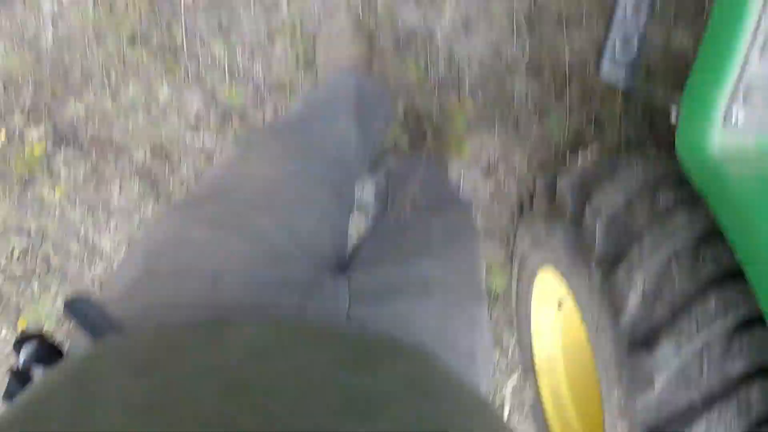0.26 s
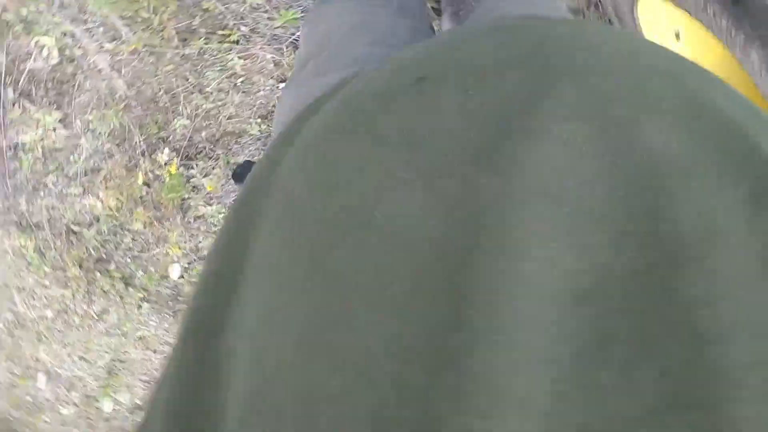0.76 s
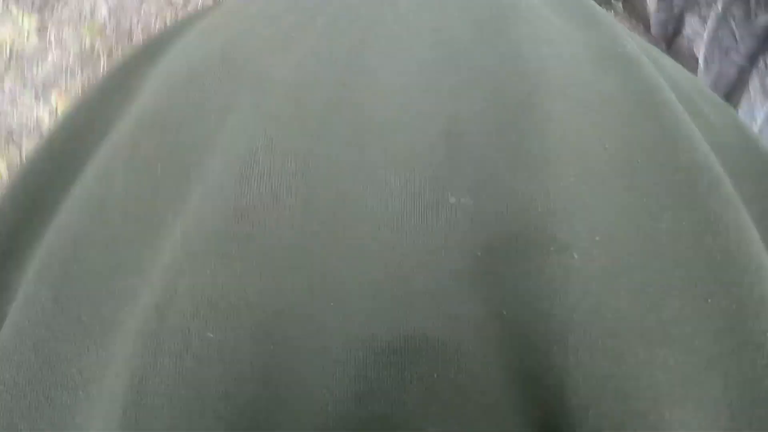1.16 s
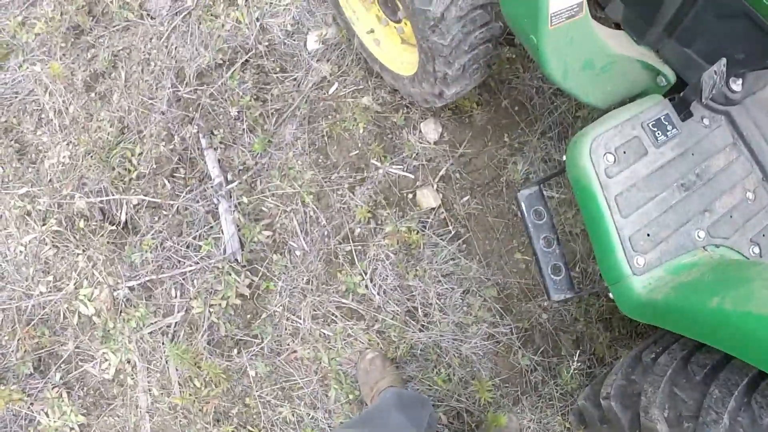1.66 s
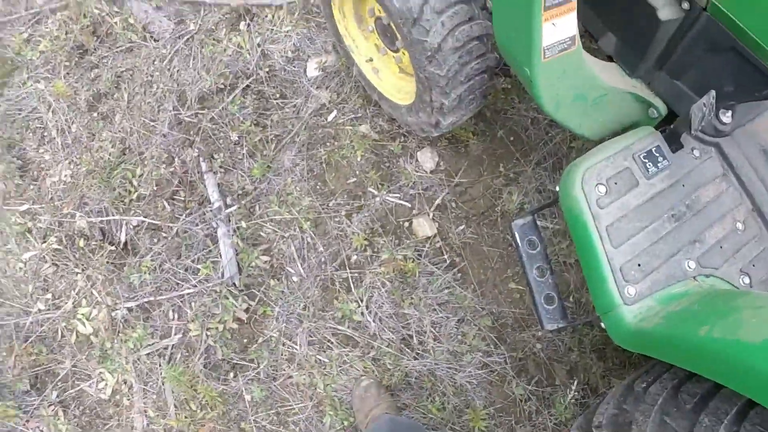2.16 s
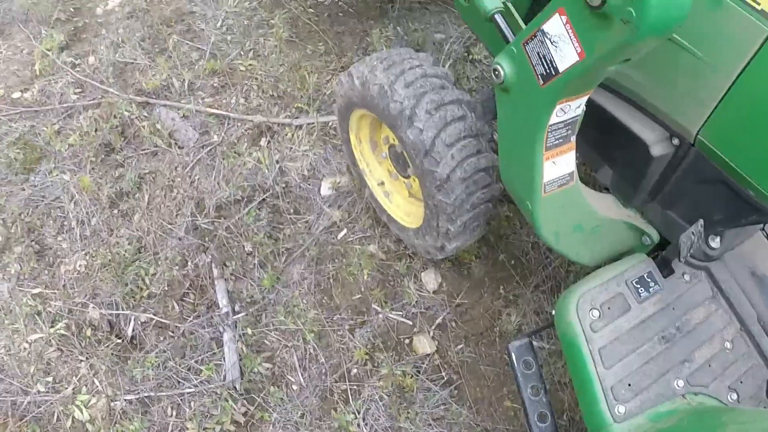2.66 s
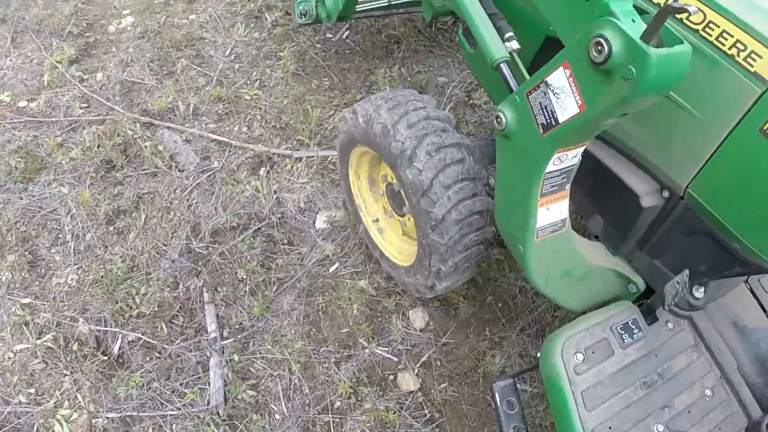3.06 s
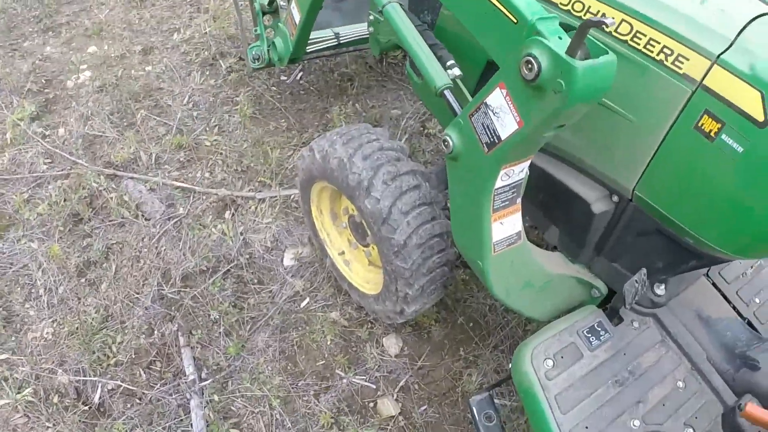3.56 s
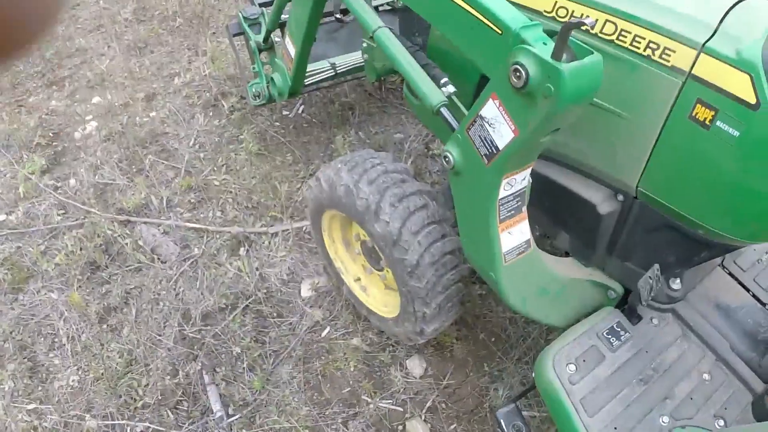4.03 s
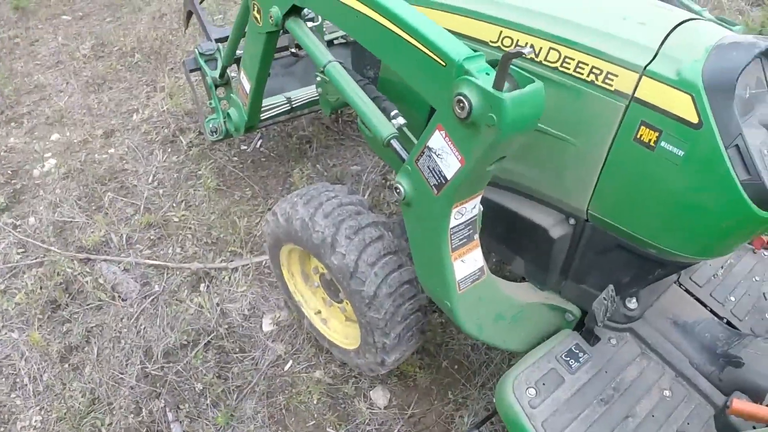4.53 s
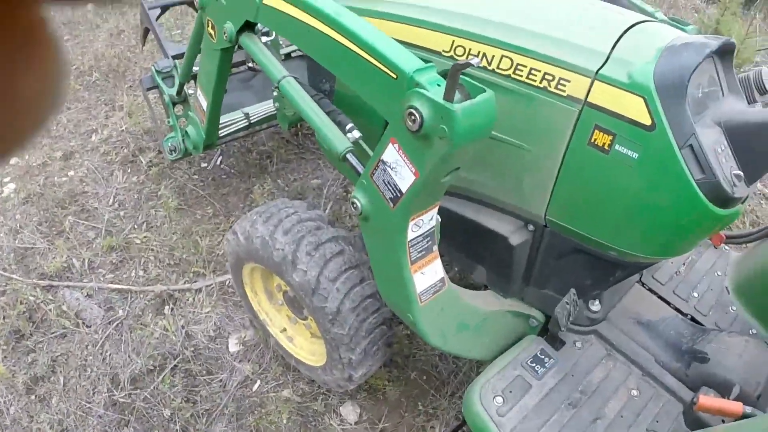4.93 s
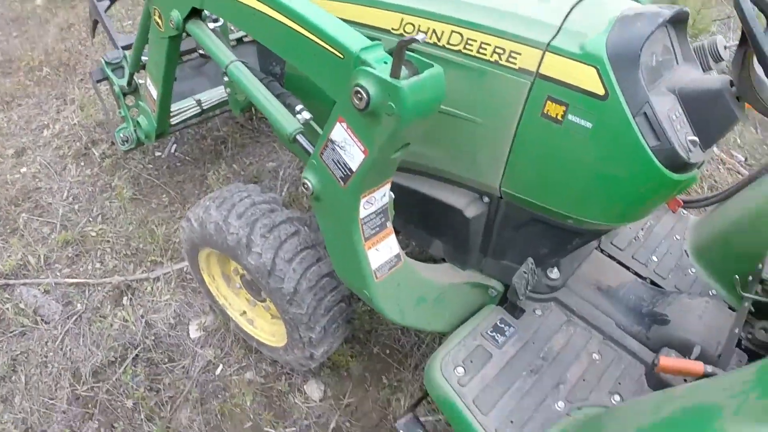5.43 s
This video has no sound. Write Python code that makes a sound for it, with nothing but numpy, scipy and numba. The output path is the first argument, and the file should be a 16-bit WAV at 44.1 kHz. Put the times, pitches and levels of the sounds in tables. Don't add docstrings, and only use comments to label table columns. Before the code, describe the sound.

A small plastic camera is handled outdoors: faint rustles, a hard double knock, near quiet, then a dense burst of scraping, pops and creaks.

```python
import sys
import numpy as np
from scipy import signal
from scipy.fft import rfft, irfft
from scipy.io import wavfile
from scipy.ndimage import uniform_filter1d
from numba import njit

SR = 44100
rng = np.random.default_rng(int(sys.argv[2]) if len(sys.argv) > 2 else 0)


def invert_db(x):
    u = np.asarray(x, float) / 20
    return 10 ** u


def unload_wav(signal):
    wavfile.write(
        sys.argv[1],
        SR,
        np.round(np.clip(np.atleast_2d(signal).T, -1, 1) * 32767).astype(np.int16),
    )


N = 250929


def level(x, db):
    return x * invert_db(db) / np.sqrt(np.mean(x ** 2))


def columns(rows):
    s, *rest = np.transpose(rows)
    return [np.interp(np.arange(N) / SR, s, column) for column in rest]


def band(x, lo_hz, hi_hz, order=2):
    return signal.sosfilt(signal.butter(order, [lo_hz, hi_hz], "band", fs=SR, output="sos"), x)


def ring(x, modes, narrow=0.96):
    total = 0
    for k, (hz, width, db) in enumerate(modes):
        b, a = signal.iirpeak(hz, narrow * hz / width, fs=SR)
        total = total + (-1) ** k * invert_db(db) * signal.lfilter(b, a, x)
    return total


@njit
def moving_band(x, hz, width):
    y, b, l = np.empty(len(x)), 0., 0.
    for i in range(len(x)):
        g, k = np.tan(np.pi * hz[i] / SR), width / hz[i]
        v = (b + g * (x[i] - l)) / (1 + g * (g + k))
        b, l, y[i] = 2 * v - b, l + 2 * g * v, k * v
    return y


def bent(x, modes, hz, narrow=0.84):
    total = 0
    for k, (mode_hz, width, db) in enumerate(modes):
        moved_hz = mode_hz * hz / modes[1][0]
        total = total + (-1) ** k * invert_db(db) * moving_band(x, moved_hz, width / narrow)
    return total


def walk(rate):
    k = int(SR / rate)
    steps = np.repeat(rng.standard_normal(N // k + 1), k)
    return 1.08 * uniform_filter1d(uniform_filter1d(steps, k), k)[:N]


def dying_tone(u, hz, t60):
    return np.sin(2 * np.pi * hz * u) * np.exp(-np.log(1000) * u / t60)


def touch(start, hold, rise_db_s, fall_db_s):
    u = np.arange(0, N, 8) / SR - start
    slope_db = np.minimum(rise_db_s * u, fall_db_s * (hold - u))
    return invert_db(2 * np.minimum(0, slope_db).clip(-90))


# (pitch_hz, level_db)
AIR_COLOUR = [(290, -35.5), (500, -4.5), (695, -8), (1440, -4.5), (1520, -20), (1730, -11.5), (2030, -7),
              (15200, -37)]


def air():
    hz, db = np.transpose(AIR_COLOUR)
    f = np.arange(N // 2 + 1) * SR / N + 1
    colour = invert_db(np.interp(np.log(f), np.log(hz), db))
    return level(irfft(rfft(rng.standard_normal(N)) * colour, N), -57.5)


# (time_s, level_db)
HUSH_LEVEL = [
    (0, 0),
    (1.22, 0),
    (1.25, -7),
    (1.55, -4),
    (1.9, 0),
    (5.1, 0),
    (5.25, -4),
    (5.5, 1),
    (5.69, 2),
]


def changing_hush():
    return invert_db(columns(HUSH_LEVEL)[0]) * air()


# (time_s, level_db, hum_pitch_hz, hum_share_db)
BREEZE_GUSTS = [(0.0, -50, 393, -20), (0.75, -55, 330, -12), (1.1, -50, 229.3, 1), (1.5, -51, 387, -3),
                (2.2, -51, 374, 2.5), (2.63, -56, 286.3, -25), (3.17, -53.5, 348.7, -12),
                (4.18, -43.5, 476.5, -9), (4.93, -49.5, 288.2, -2), (5.02, -44, 401.5, -3),
                (5.69, -53, 328.5, -5.5)]


def breeze():
    gust_db, hz, hum_db = columns(BREEZE_GUSTS)
    slow_filter = signal.butter(2, 60, fs=SR, output="sos")
    slow = level(signal.sosfilt(slow_filter, rng.standard_normal((2, N))), 0)
    phase = 2 * np.pi * np.cumsum(hz) / SR
    hum = slow[0] * np.cos(phase) + slow[1] * np.sin(phase)
    flutter = level(band(rng.standard_normal(N), 130, 600), 0)
    waver_db = 1.3 * walk(30)
    return invert_db(gust_db + waver_db) * (invert_db(hum_db) * hum + invert_db(1) * flutter)


# (start_s, pitch_hz, peak_db, t60_s)
PALM_THUMPS = [
    (3.399, 54, -18.5, 0.057),
    (3.652, 70, -22, 0.037),
    (3.738, 75, -15, 0.029),
    (4.021, 51.4, -20.5, 0.11),
    (4.912, 63, -4, 0.06),
]


def thump(s, hz, db, t60):
    u = np.maximum(np.arange(N) / SR - s, 0)
    return invert_db(db) * dying_tone(u, hz, t60) * (1 - np.exp(-u / 0.0026))


# (time_s, level_db)
RESTING_GRIP = [
    (0.0, -52),
    (1.13, -55),
    (1.56, -59.5),
    (2.51, -53),
    (3.2, -58.5),
    (4.4, -46),
    (5.3, -80),
    (5.69, -49.5),
]
# (start_s, hold_s, level_db)
GRIP_SQUEEZES = [(1.22, 0.016, -47), (1.35, 0.052, -47.5), (3.29, 0.081, -50), (3.34, 0.024, -44),
                 (3.841, 0.032, -36), (3.89, 0.046, -33.5), (3.976, .015, -40), (4.22, 0.017, -36),
                 (4.267, .015, -36), (4.338, 0.018, -47), (4.778, 0.026, -38), (5.068, 0.018, -45),
                 (5.195, 0.037, -41.5), (5.395, 0.068, -44.5), (5.625, 0.04, -50)]


def grip():
    wobble = level(band(rng.standard_normal(N), 12, 99), 0.085)
    power = invert_db(2 * columns(RESTING_GRIP)[0][::8])
    for s, hold, db in GRIP_SQUEEZES:
        power = power + invert_db(2 * db) * touch(s, hold, rise_db_s=485, fall_db_s=406.5)
    strength = np.interp(np.arange(N), np.arange(0, N, 8), np.sqrt(power))
    unsteady = invert_db(2.2 * walk(22))
    return wobble * strength * unsteady + sum(thump(*row) for row in PALM_THUMPS)


# (start_s, hold_s, pitch_hz, level_db)
EDGE_SHEENS = [(1.26, .11, 9700, -68), (1.39, .075, 2850, -59), (2.27, .2, 6000, -68),
               (3.846, .016, 7000, -34), (4.285, .04, 7300, -33), (4.06, .04, 3900, -35),
               (4.65, .012, 4100, -30), (4.74, .02, 4000, -32), (4.78, .025, 7200, -40),
               (4.897, .022, 7400, -38), (4.96, .025, 7000, -41), (5.01, .045, 3900, -34),
               (5.41, .03, 4100, -34), (5.507, .018, 3900, -35)]


def sheens():
    out, u = np.zeros(N), np.arange(-2500, 11500) / SR
    slope_db_s, width = 1400, 0.22
    noises = rng.standard_normal((len(EDGE_SHEENS), len(u)))
    for (s, hold, hz, db), noise in zip(EDGE_SHEENS, noises):
        tone = level(band(noise, hz * (1 - width / 2), hz * (1 + width / 2)), db)
        swell = invert_db(np.minimum(0, slope_db_s * np.minimum(u, hold - u)))
        at = int((s + u[0]) * SR)
        out[at:at + len(u)] += (tone * swell)[:N - at]
    return out


# (start_s, pitch_hz, peak_db, t60_s)
GRIT_TICKS = [(0.144, 910, -33, .03), (0.162, 1600, -34, .03), (0.277, 860, -28, .03),
              (0.311, 3300, -32, .02), (0.3275, 2850, -29, .025), (0.393, 1600, -37, .03),
              (0.52, 900, -34, .03), (0.476, 870, -32, .03), (0.502, 2800, -35, .02),
              (0.676, 4500, -40, .012), (0.691, 1620, -29, .03), (0.713, 2500, -36, .015),
              (1.276, 2900, -36, .03), (1.346, 1150, -24, .025), (2.2742, 2580, -28, .016),
              (2.275, 1800, -35, .02), (2.3146, 2580, -34, .025), (2.4727, 2710, -32, .016),
              (2.5076, 2790, -34, .025), (2.508, 6300, -40, .02), (2.5336, 1570, -36, .03),
              (2.5336, 2800, -38, .03), (2.5655, 2880, -42, .03), (3.7298, 2740, -15, .025),
              (3.8459, 2820, -9, .015), (3.955, 600, -18, .03), (4.6155, 900, -20, .03),
              (5.1997, 2750, -3, .011), (5.227, 1250, -15, .02), (5.4565, 3800, -18, .012)]


def ticks():
    out, u = np.zeros(N), np.arange(2000) / SR
    for s, hz, db, t60 in GRIT_TICKS:
        at = int(s * SR)
        out[at:at + len(u)] += invert_db(db) * dying_tone(u, hz, t60) * (1 - np.exp(-u / .0003))
    return out


# (start_s, pitch_hz, width_hz, peak_db, t60_s)
NAIL_FLICKS = [(3.6925, 3241, 3000, -30, .03), (3.704, 480, 280, -26, 0.019),
               (3.768, 3926, 1389, -14, 0.032), (3.8455, 3300, 2315, -14, .012),
               (4.627, 4167, 6000, -21, 0.014), (4.676, 4630, 4630, -31, 0.014),
               (4.7915, 7000, 7000, -11.5, .008), (4.8562, 4400, 2778, -19, 0.018),
               (5.2395, 2600, 1500, -33, 0.0084), (3.237, 1450, 231.5, -31.5, 0.046),
               (2.508, 1000, 400, -36, .04), (2.315, 1600, 700, -40, 0.02), (2.472, 1800, 900, -41, 0.02),
               (4.4554, 880, 203, -12.5, 0.034), (0.424, 1840, 500, -28, 0.03),
               (1.605, 4500, 3030, -48, .015), (4.468, 880, 200, -12.5, 0.045),
               (4.478, 880, 200, -13.5, .06), (4.489, 880, 200, -12, 0.052),
               (1.331, 2900, 500, -21.5, 0.064), (1.392, 3600, 1510, -34.5, .02),
               (0.327, 1300, 700, -19, 0.025), (0.501, 900, 400, -31, 0.03), (3.741, 2770, 400, -14, 0.046),
               (3.985, 850, 200, -13.5, 0.074), (4.181, 1100, 600, -7.5, .03),
               (4.189, 1200, 700, -5, 0.034), (4.2343, 2800, 900, -5.5, 0.028),
               (4.272, 2780, 900, -7.5, 0.035), (4.763, 890, 200, -12.5, 0.13),
               (4.779, 910, 250, -12.5, 0.053), (5.1988, 13000, 6000, -19, 0.005),
               (0.16, 2700, 500, -38, .03), (0.785, 1700, 400, -38.5, 0.036)]


def flicks():
    out, u = np.zeros(N), np.arange(2000) / SR
    noises = rng.standard_normal((len(NAIL_FLICKS), len(u)))
    for (s, hz, width, db, t60), noise in zip(NAIL_FLICKS, noises):
        tone = noise * np.exp(-np.log(1000) * u / t60)
        for _ in range(2):
            tone = moving_band(tone, hz + 0 * u, 1.5 * width)
        at = int(s * SR)
        out[at:at + len(u)] += invert_db(db) * tone / np.abs(tone).max()
    return out


# (time_s, wall_drag_db, hiss_above_drag_db)
CLOTH_DRAG = [(0.0, -52, -13), (0.5, -53.5, -12), (0.58, -56.5, -5.5), (1.15, -57.5, -9.5),
              (1.25, -56.5, -22), (1.47, -60, -10), (2.22, -63.5, -2), (2.28, -57, -2), (2.53, -55.5, -1),
              (2.6, -55.5, -12), (3.2, -60, -1.5), (3.38, -44, -17), (3.64, -55.5, -11.5), (5.2, -37, -17),
              (5.26, -71, -13)]
# (start_s, hold_s, wall_db, lid_above_wall_db)
FINGER_PRESSES = [(3.392, 0.0075, -29.5, 2), (3.723, 0.0027, -24.5, -20), (3.74, 0.013, -26, 6),
                  (3.8, 0.066, -33.5, -6), (3.848, 0.034, -30, -2), (3.91, 0.025, -25.5, -4),
                  (3.973, 0.019, -18, -4), (4.04, 0.0061, -24.5, -16), (4.06, .05, -34.5, 5),
                  (4.12, 0.044, -27, -1), (4.167, 0.035, -17.5, -8), (4.213, 0.063, -24, 3),
                  (4.266, 0.051, -20.5, -5), (4.332, 0.088, -26, -7), (4.429, 0.011, -22, -10),
                  (4.453, 0.044, -25.5, -9), (4.506, 0.047, -30, 0), (4.63, .028, -32, 0.5),
                  (4.7, 0.038, -29, -10), (4.745, 0.048, -23, -9), (4.88, 0.015, -42.5, 2),
                  (4.915, 0.0077, -18, -9), (4.963, 0.033, -26, -8), (4.998, 0.059, -33.5, -11),
                  (5.071, 0.025, -29.5, -14), (5.124, 0.055, -37, -7.5), (5.227, 0.0028, -29.5, -2),
                  (5.379, 0.067, -33, -5), (5.445, 0.01, -27, -2.5), (5.506, 0.018, -38, -9)]
# (start_s, hold_s, scratch_db, hiss_above_scratch_db)
SKIN_SLIDES = [(3.39, 0.0048, -33.5, -9.5), (3.682, 0.019, -43.5, -4.5), (3.731, 0.011, -22.5, -15.5),
               (3.759, 0.008, -29.5, -13), (3.795, 0.028, -35.5, -8.5), (3.852, 0.006, -21, -3),
               (3.883, 0.015, -25.5, -7), (3.924, 0.012, -21, -5.5), (3.946, 0.025, -26.5, 0),
               (3.978, 0.013, -18, -10.5), (4.034, 0.19, -23, -12), (4.185, 0.025, -17.5, -16),
               (4.213, 0.008, -21, -4), (4.261, 0.02, -14.5, -8), (4.282, 0.028, -18.5, -6.5),
               (4.325, 0.034, -29, -13.5), (4.373, 0.064, -21.5, -11), (4.512, 0.037, -29.5, -9),
               (4.545, 0.029, -28.5, -15), (4.742, 0.013, -22, -5), (4.772, 0.023, -24, -10),
               (4.8, 0.032, -29, -11), (4.858, 0.03, -35.5, -16), (4.907, 0.011, -25, -2.5),
               (4.963, 0.048, -27, -13.5), (4.988, 0.07, -29, -16), (5.065, .045, -34, -13),
               (5.106, 0.081, -41, -28), (5.392, .025, -29, -9.5), (5.413, 0.024, -23.5, -7),
               (5.452, 0.015, -31, -10.5), (5.51, 0.012, -29, -14)]
# (start_s, hold_s, scratch_db, hiss_above_scratch_db)
STICKING_SWEEPS = [
    (4.656, 0.0083, -20, -10.5),
    (3.873, 0.0085, -29, -12),
    (5.185, 0.013, -32, -18),
    (4.231, 0.0067, -15, -10),
]
# (start_s, hold_s, wall_db, scratch_above_wall_db)
SLEEVE_RUBS = [
    (0.132, 0.074, -43.5, -9),
    (0.251, 0.049, -40.5, -10),
    (0.32, 0.13, -45.5, -8),
    (0.471, 0.062, -44.5, -10),
    (1.192, 0.017, -46, -5),
    (1.266, 0.038, -45.5, 2.5),
    (1.327, .043, -38, -6.5),
    (1.399, 0.0045, -50, 0),
    (1.87, 0.09, -55, 0.5),
]


def contact():
    drag_db, fine_db = np.array(columns(CLOTH_DRAG))[:, ::8]
    cloth_db = drag_db + np.array([0 * fine_db, 6 + 0.55 * fine_db, 4.5 + 0.51 * fine_db, fine_db])
    power = invert_db(2 * cloth_db)

    def add(parts_db, s, hold, rise_db_s, fall_db_s):
        return power + invert_db(2 * np.array(parts_db))[:, None] * touch(s, hold, rise_db_s, fall_db_s)

    for s, hold, db, lid_db in FINGER_PRESSES:
        power = add([db, db + lid_db, db - 8, db - 29], s, hold, 907, 815)
    for s, hold, db, hiss_db in SKIN_SLIDES:
        power = add([db - 17, db - 11.5, db, db + hiss_db], s, hold, 800, 806)
    for s, hold, db, hiss_db in STICKING_SWEEPS:
        power = add([db - 17, db - 11.5, db, db + hiss_db], s, hold, 550.5, 5002)
    for s, hold, db, scratch_db in SLEEVE_RUBS:
        power = add([db, db - 2.5, db + scratch_db, db - 22.5], s, hold, 1201.5, 997.5)
    wall_db, *others = np.repeat(10 * np.log10(power), 8, axis=1)[:, :N]
    return [wall_db] + [db - wall_db for db in others]


def slips(rate, spread_db, smooth):
    when = rng.random(N) < rate / SR
    size = invert_db(spread_db * np.minimum(rng.exponential(size=N), 3)) * rng.standard_normal(N)
    return level(level(when * size, 0) + smooth * rng.standard_normal(N), 0)


# (pitch_hz, width_hz, level_db)
WALL_MODES = [
    (560, 290, -7.5),
    (854, 117, 8.5),
    (1203, 178, 0.5),
]
# (pitch_hz, width_hz, level_db)
LID_MODES = [
    (1350, 260, -5.5),
    (1645, 297, 1.5),
]
# (pitch_hz, width_hz, level_db)
SCRATCH_MODES = [
    (2456, 920, -3.5),
    (2770, 232, 6.5),
    (3410, 440, -3),
]
# (pitch_hz, width_hz, level_db)
EDGE_MODES = [
    (3880, 545, -2),
    (5800, 1200, -18.5),
]
# (pitch_hz, width_hz, level_db)
HISS_MODES = [
    (5410, 1760, -3),
    (6650, 640, 0),
    (7470, 430, -3),
    (10800, 2400, -11.5),
    (13200, 1800, -14),
    (15100, 910, -27),
]
# (time_s, wall_pitch_hz, scratch_pitch_hz)
SHELL_STIFFNESS = [
    (3.68, 843, 2730),
    (4.044, 852, 2810),
    (4.122, 916, 2753),
    (4.554, 913, 2730),
    (4.57, 871, 2660),
    (4.992, 914, 2820),
    (5.226, 835, 2640),
    (5.356, 920, 2820),
    (5.55, 833, 2840),
]


def strokes():
    drag_db, lid_db, scratch_db, hiss_db = contact()
    wall_hz, scratch_hz = columns(SHELL_STIFFNESS)
    light = np.clip((-38 - drag_db) / 6, 0, 1)
    drag_db = drag_db + 0.4 * walk(90) + 1.64 * walk(300)
    crackle = .5 * light * slips(200, 3, .1)
    coarse = slips(1500, 1.7, 1.78) + crackle
    fine = slips(4000, 2.5, 1.0)

    wall = level(band(bent(coarse, WALL_MODES, wall_hz), 200, 1700), -0.23) * invert_db(1.3 * walk(120))
    lid = level(band(ring(coarse, LID_MODES), 690, 2500), -3.5) * invert_db(lid_db + 1.2 * walk(60))
    mid = level(band(bent(coarse + fine, SCRATCH_MODES, scratch_hz), 1990, 3470), -2.82)
    mid = mid * invert_db(scratch_db + 1.4 * walk(60))
    edge_db = 0.96 * scratch_db + 0.28 * (hiss_db + 7.0) - 3 * light
    edge = level(band(ring(fine, EDGE_MODES), 3690, 6930), -7.0) * invert_db(edge_db + walk(30))

    shell = level(band(ring(fine, HISS_MODES), 3300, 17300), -1.02)
    cloth = level(band(rng.standard_normal(N), 3900, 7700, order=1), -0.61)
    far = np.clip((-52 - drag_db - hiss_db) / 8, 0, 1)
    hiss = np.sqrt(1 - far) * shell + np.sqrt(far) * cloth
    top = hiss * invert_db(hiss_db + 1.4 * walk(60))
    return invert_db(drag_db) * (wall + lid + mid + edge + top)


# (pitch_hz, width_hz, level_db)
BELLY_MODE = [
    (282, 180, -1),
]
# (start_s, peak_db, push_pitch_hz,
# tick_above_push_db, ring_share_db)
CRACKLES_AND_POPS = [(0.045, -34, 620, -21, -1), (0.123, -29, 1200, -16, 6), (0.161, -34, 890, -7, 2),
                     (0.31, -22, 1640, -16, -5), (0.327, -22, 1430, -17, 12), (0.422, -31, 850, -8, 5),
                     (0.501, -29.5, 880, -8, 8), (0.675, -40.5, 900, 6.5, 6), (0.688, -33, 1640, -1, 21),
                     (1.274, -31, 1000, -13, 4), (1.329, -26, 1110, -6, 5), (1.344, -20.5, 930, -20, 14),
                     (1.39, -36, 826, 0, 6), (2.273, -40, 2400, -1, -5), (2.313, -50, 479, -5, -7),
                     (2.471, -41, 1350, 0, -20), (2.507, -39.5, 1010, -3, 20.5), (3.236, -48, 1470, -26, 8),
                     (3.293, -27.5, 637, -14, 4), (3.655, -30, 760, -22, 3), (1.289, -31, 1090, -13, 2.5),
                     (1.888, -35, 1290, -5, 0), (5.5, -25, 940, -9.5, -4), (5.546, -47, 450, 5, -5),
                     (3.399, -14, 796, -9, 8), (3.692, -20, 1290, -12, -14), (3.716, -15, 820, -16, 13.5),
             (3.767, -20.5, 886, 3, -6), (3.811, -15, 710, -21, 10.5), (3.842, -13.5, 930, -2, 14.5),
             (3.858, -1, 3260, -9, -9), (3.887, -13.5, 1020, -12, 8.5), (3.918, -7.5, 640, -9, 0),
             (4.021, -14.5, 1264, -5, 16), (4.054, -19.5, 888, -17, 15.5), (4.166, -20, 910, -13, 21),
             (4.179, -13, 1050, -17, 17.5), (4.232, -14, 1100, -6, 13), (4.27, -10.5, 1230, -6, 12.5),
             (4.63, -8, 950, -10, -5), (4.675, -17.5, 928, -15, 1), (4.789, -16, 1105, -16, -7.5),
             (4.894, -8.5, 1680, -13, 6), (4.915, -6, 1010, -11, -21), (5.1975, 3, 1100, -16, -18),
             (5.2236, -4, 560, -30, 3), (5.364, -13, 940, -13.5, -16), (5.405, -19.5, 495, -14.5, -1)]
# (start_s, peak_db,
# push_pitch_hz, tick_above_push_db)
JOINT_CREAKS = [(4.58, -9, 845, -25), (4.5906, -7.5, 900, -12.5), (4.6057, -10, 905, -17),
                (4.6135, -17, 810, -13), (4.855, -32, 1500, -8), (4.983, -12, 900, -20),
                (5.019, -17, 650, -22), (5.037, -15, 760, -20), (5.05, -10, 740, -27),
                (5.067, -10, 780, -22), (5.0795, -10.5, 720, -25), (5.0925, -11, 740, -25),
                (5.126, -9.5, 740, -25), (5.145, -8, 800, -22), (5.1532, -8, 1090, -20),
                (5.172, -5.5, 895, -15), (5.198, -5, 5600, -21), (5.241, -34, 1100, -20)]


def pops():
    direct, rung, tick_drive, snaps = np.zeros((4, N))
    u = np.arange(500) / SR
    creaks = [row + (-5,) for row in JOINT_CREAKS]
    rows = CRACKLES_AND_POPS + creaks
    signs = rng.choice([-1, 1], (len(rows), len(u)))
    for (s, db, hz, tick_db, ring_db), sign in zip(rows, signs):
        snap_db = -11 + 0.9 * tick_db - 4 * (db < -20)
        at = slice(int(s * SR), int(s * SR) + len(u))
        cycles = hz * (u - .0013) - .7
        push = invert_db(db) * np.cos(2 * np.pi * cycles - 1.1) * np.exp(-(cycles / 0.38) ** 2)
        direct[at] += push
        rung[at] += invert_db(ring_db) * push
        burst = sign * np.exp(-((u - .002) / 0.00046) ** 2)
        tick_drive[at] += invert_db(db + tick_db) * burst
        snaps[at] += invert_db(db + snap_db) * burst
    tick = invert_db(15.5) * band(ring(tick_drive, SCRATCH_MODES, 0.43), 1250, 3300)
    edge_tick = invert_db(6.0) * band(ring(tick_drive, EDGE_MODES), 2100, 4600)
    snap = invert_db(2.5) * band(snaps, 4000, 7000)
    body = .5 * ring(rung, WALL_MODES + LID_MODES) + invert_db(-3.0) * ring(direct, BELLY_MODE)
    return band(direct, 79, 15000, order=1) + body + tick + edge_tick + snap


# (start_s, rattle_s, wall_db, scratch_db, thud_db)
HARD_KNOCKS = [
    (1.221, 0.0042, -24.5, -9, -17),
    (1.2341, 0.0025, -23, -10, -24),
    (1.238, 0.0046, -23.5, -20.5, -26.5),
    (5.2005, 0.0035, -18, -24, -21),
    (5.4509, 0.0022, -11, -11, -21.5),
    (5.454, 0.002, -14, -19, -30),
    (5.455, 0.001, -28, -18, -26),
]


def knocks():
    drive = np.zeros((3, N))
    u = np.arange(1200) / SR
    signs = rng.choice([-1, 1], (len(HARD_KNOCKS), len(u)))
    for (s, length, *group_db), sign in zip(HARD_KNOCKS, signs):
        at = int(s * SR)
        rattle = np.exp(-(u / length) ** 2) * sign
        drive[:, at:at + len(u)] += invert_db(group_db)[:, None] * rattle
    wall, scratch, thud = drive
    low = invert_db(12.5) * ring(wall, WALL_MODES[1:], 0.39)
    lid = invert_db(7.5) * band(ring(invert_db(5.5) * scratch, LID_MODES, 0.47), 720, 2100)
    bright = invert_db(14.0) * band(ring(scratch, SCRATCH_MODES), 1900, 4300)
    edge = invert_db(-11.0) * band(ring(scratch, EDGE_MODES), 2700, 4600)
    top = invert_db(-19.5) * ring(scratch, HISS_MODES)
    return low + lid + bright + edge + top + invert_db(16.5) * band(thud, 99, 740)


# (pitch_hz, peak_db, t60_s)
FIRST_BLOW_MODES = [
    (845, -8, .08),
    (1566, 4, 0.059),
    (2820, -9, .05),
    (3300, 0, .06),
    (3640, -5, .06),
]
# (pitch_hz, peak_db, t60_s)
SECOND_BLOW_MODES = [
    (495, -13, 0.059),
    (867, -11.5, .06),
    (1120, 4.5, 0.015),
    (1330, -11, .04),
    (1650, -14, 0.044),
    (2730, -6, 0.025),
    (3240, -10.5, .03),
]
# (start_s, free_ring_s, left_over_db)
DOUBLE_KNOCK = [
    (1.2212, 0.0054, -24),
    (1.234, 0.008, -8),
]


def blows():
    out, u = np.zeros(N), np.arange(4000) / SR
    for (s, free, left_db), modes in zip(DOUBLE_KNOCK, [FIRST_BLOW_MODES, SECOND_BLOW_MODES]):
        smother = invert_db(left_db * np.tanh((u / free) ** 4)) * (1 - np.exp(-u / 0.00028))
        tones = sum(invert_db(db) * dying_tone(u, hz, t60) for hz, db, t60 in modes)
        at = int(s * SR)
        out[at:at + len(u)] += smother * tones
    return out


def scene():
    background = changing_hush() + breeze() + grip()
    small_touches = sheens() + ticks() + flicks()
    handling = strokes() + pops() + knocks() + blows()
    return (background + small_touches + handling)[None]


def duck(x):
    duck_db, delay_s, release_s = -7, 0.018, 0.25
    full_s = 0.00089
    keep = np.exp(-1 / (release_s * SR))
    memory = signal.lfilter([1 / (full_s * SR)], [1, -keep], np.abs(x) > 1)
    late = np.roll(np.tanh(memory), int(delay_s * SR), axis=-1)
    return x * invert_db(duck_db * late)


def band_limit(x):
    return signal.sosfilt(signal.butter(12, 16400, fs=SR, output="sos"), x)


def record(dry):
    top_cut = signal.ellip(10, .2, 70, 15250, fs=SR, output="sos")
    cut = signal.sosfilt(top_cut, dry)
    mix = np.clip(duck(cut), -1, 1)
    return band_limit(mix)


dry = scene()
out = record(dry)
unload_wav(out)
```